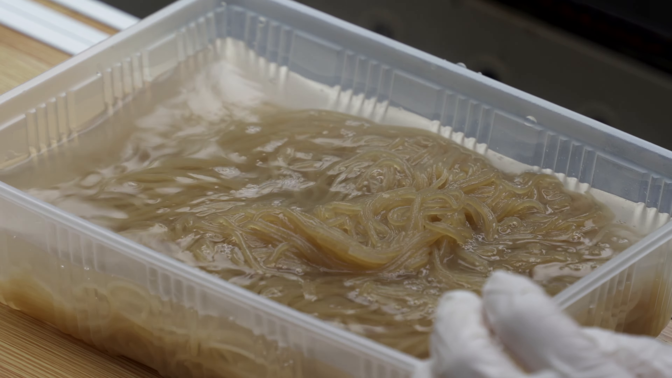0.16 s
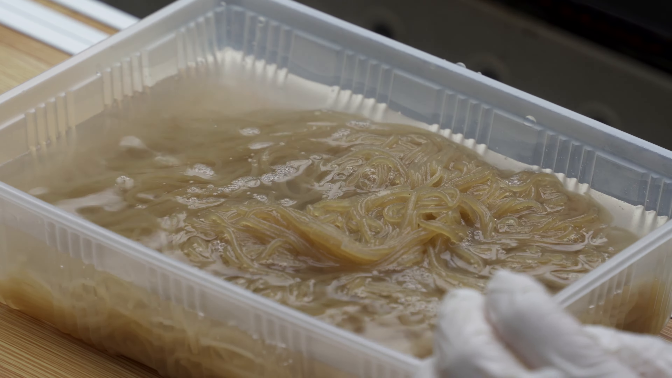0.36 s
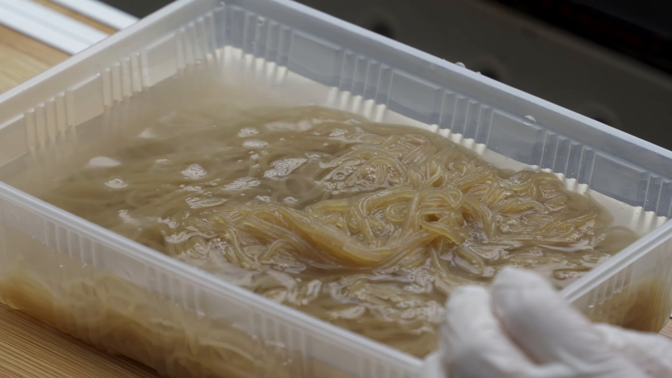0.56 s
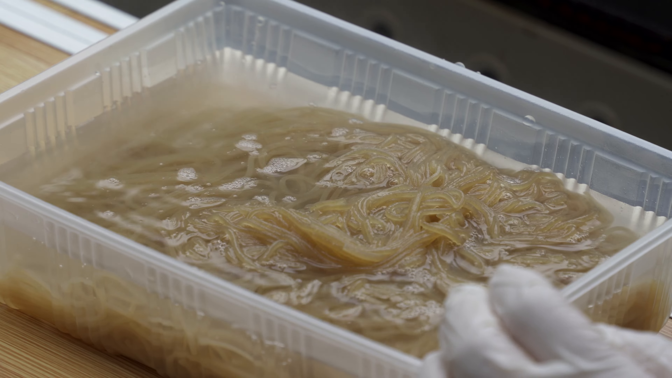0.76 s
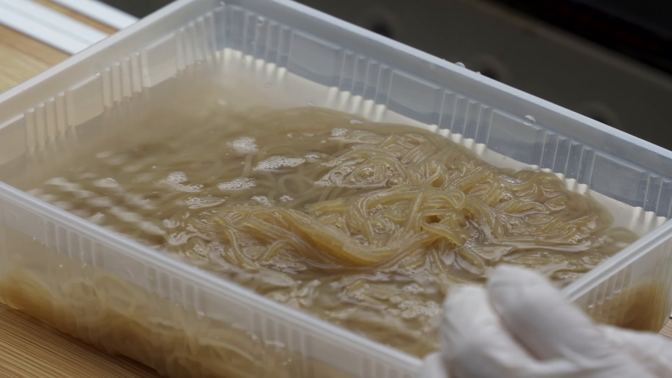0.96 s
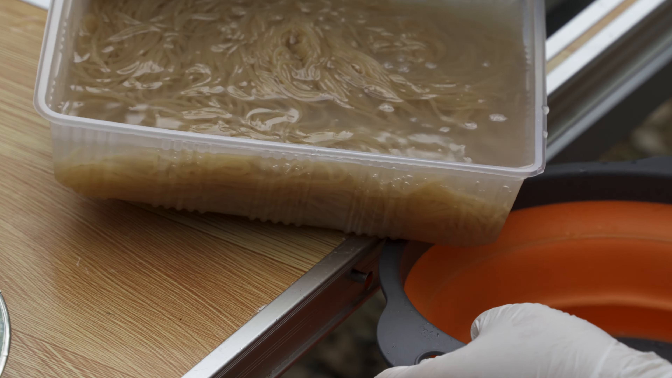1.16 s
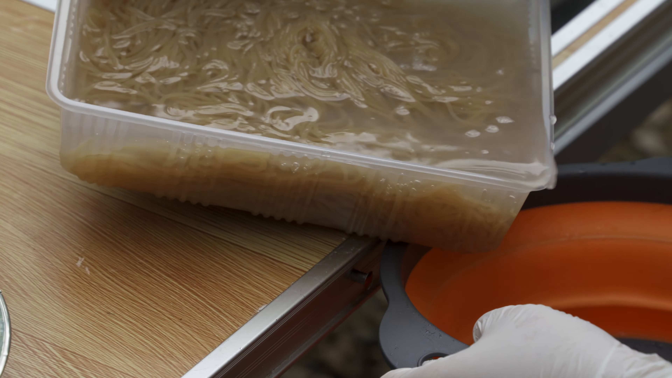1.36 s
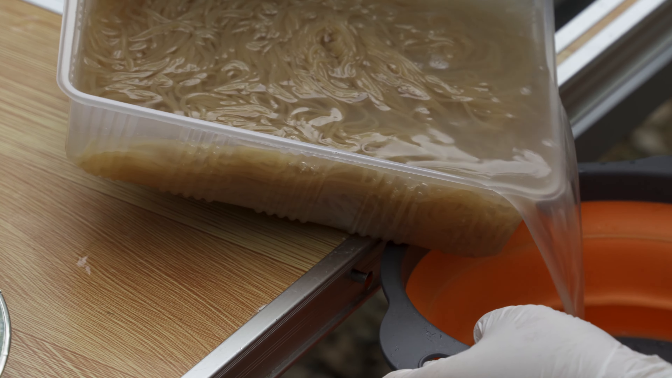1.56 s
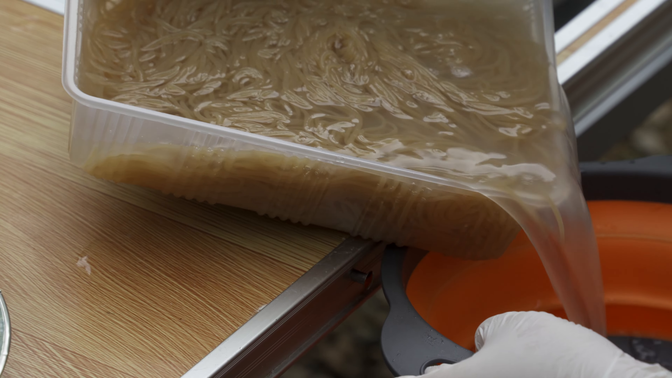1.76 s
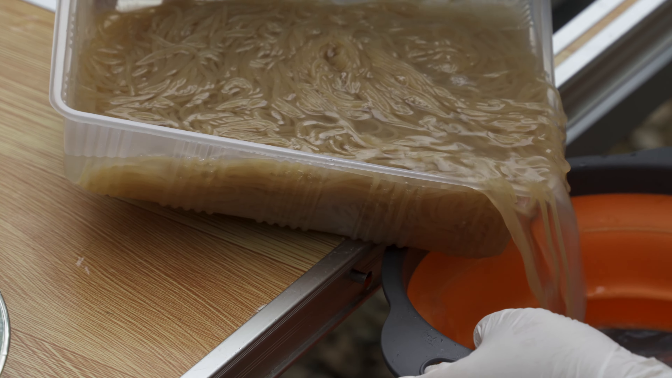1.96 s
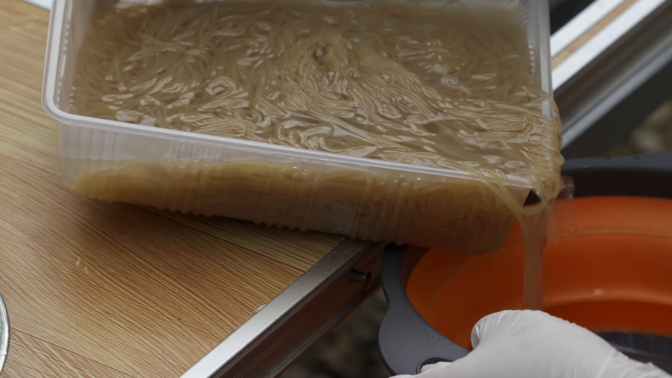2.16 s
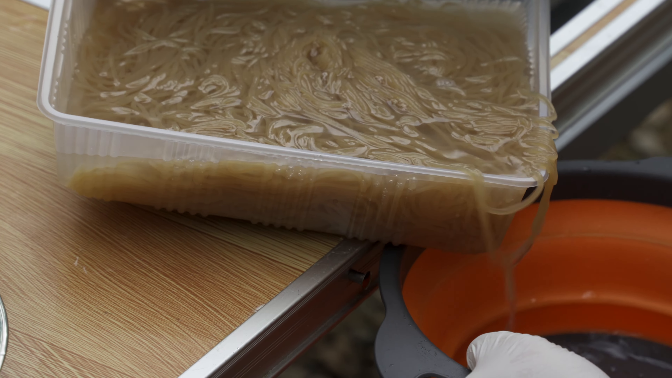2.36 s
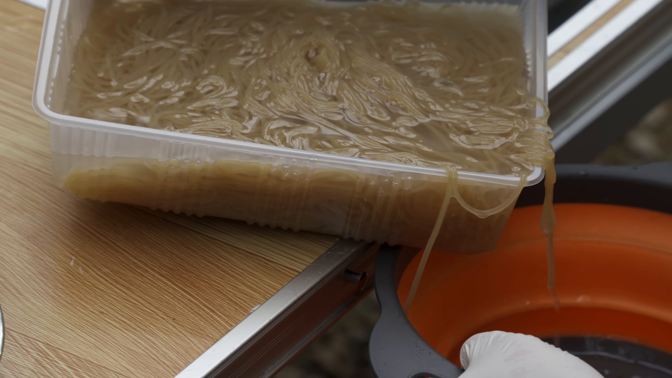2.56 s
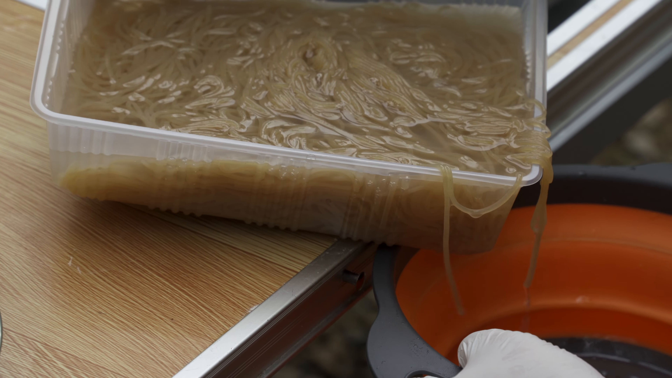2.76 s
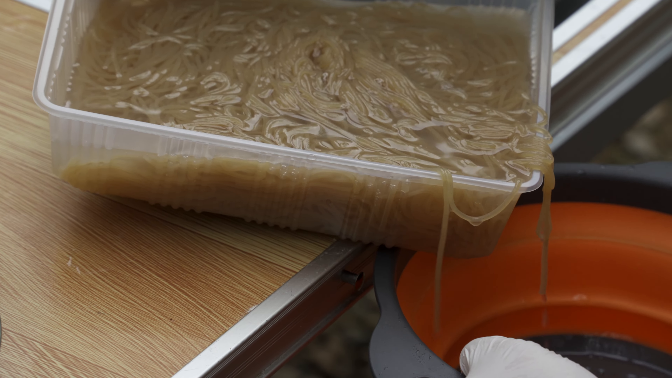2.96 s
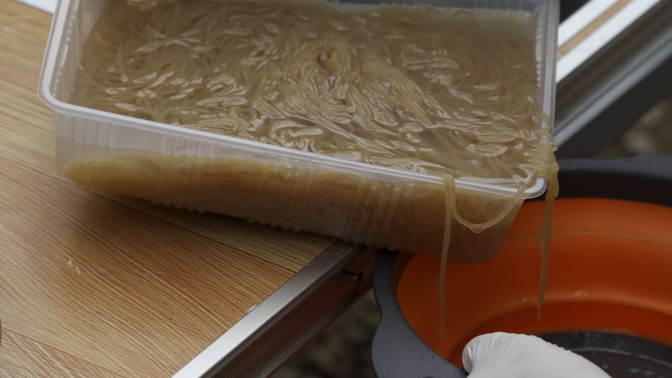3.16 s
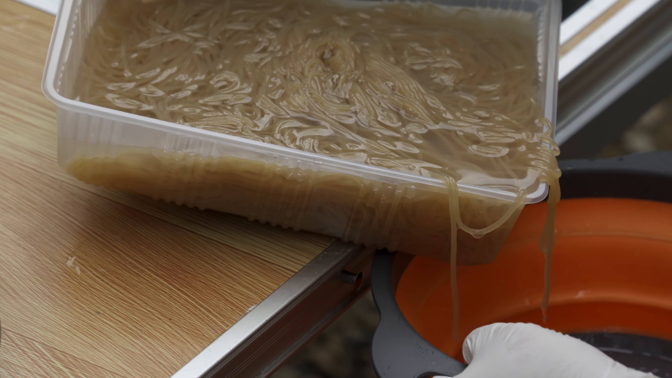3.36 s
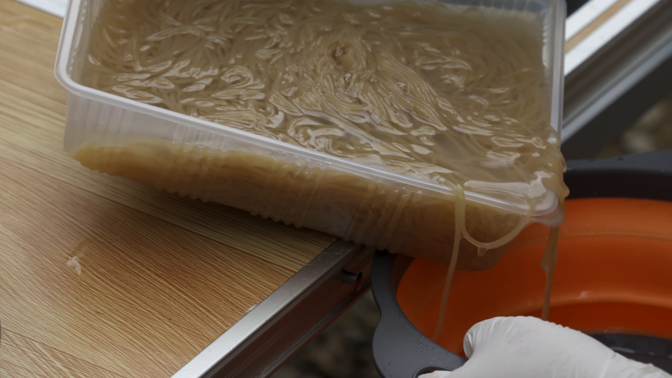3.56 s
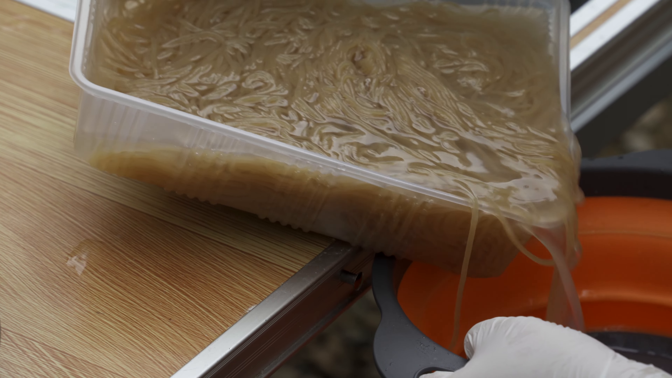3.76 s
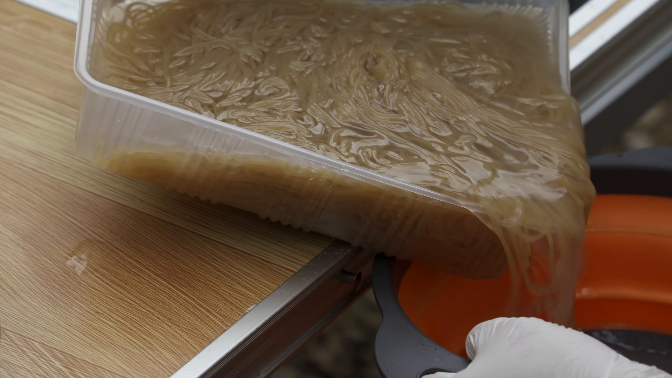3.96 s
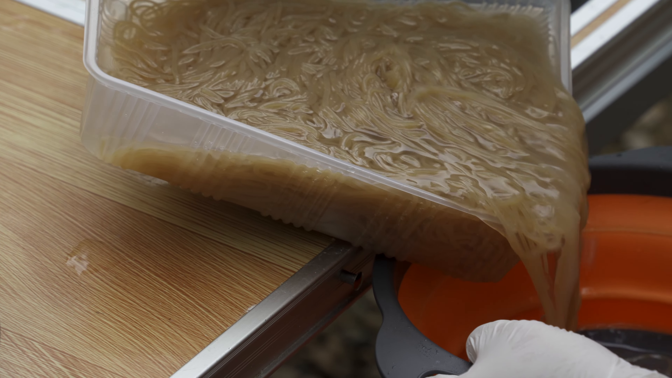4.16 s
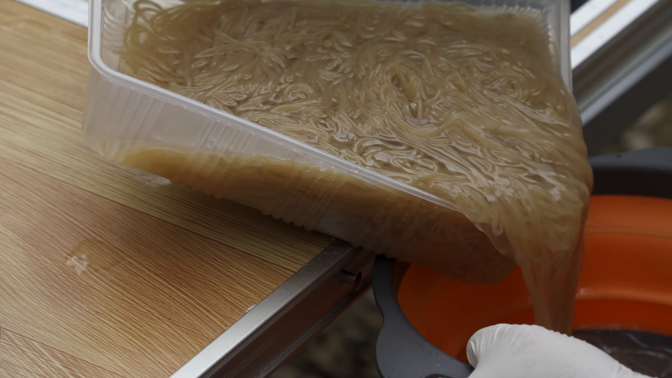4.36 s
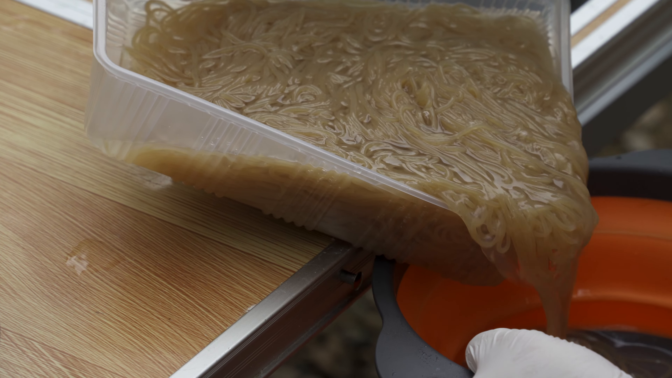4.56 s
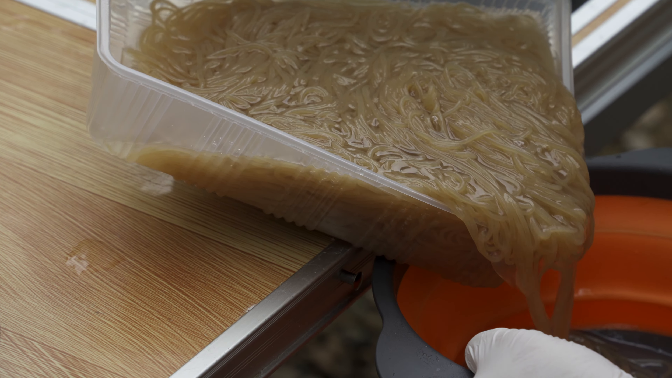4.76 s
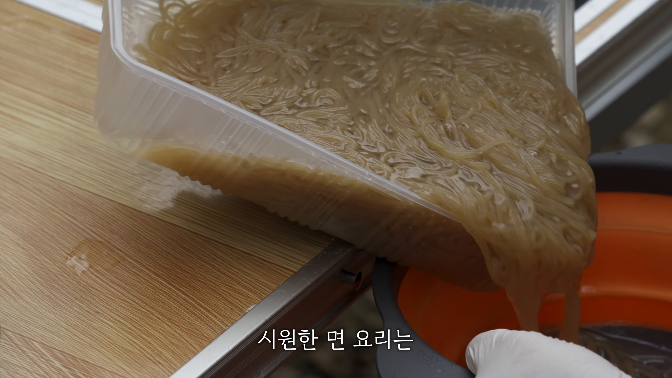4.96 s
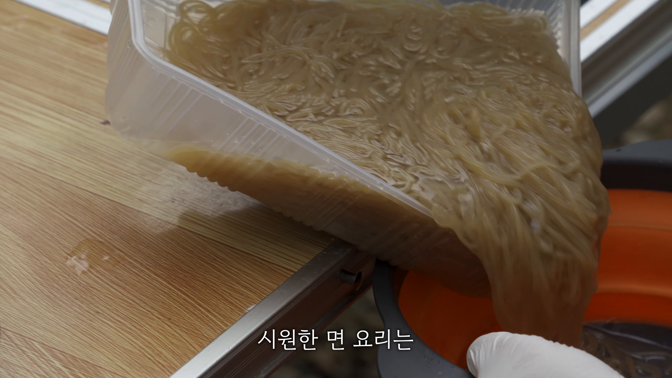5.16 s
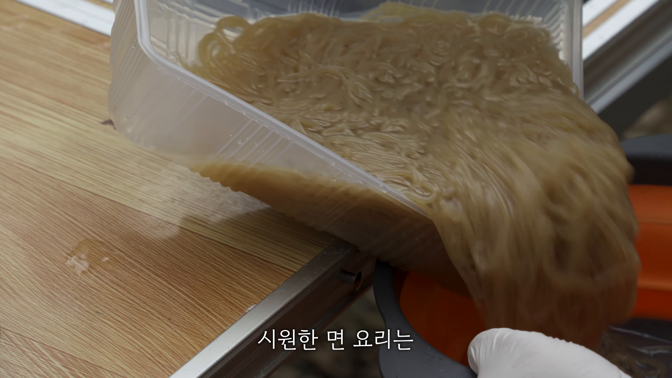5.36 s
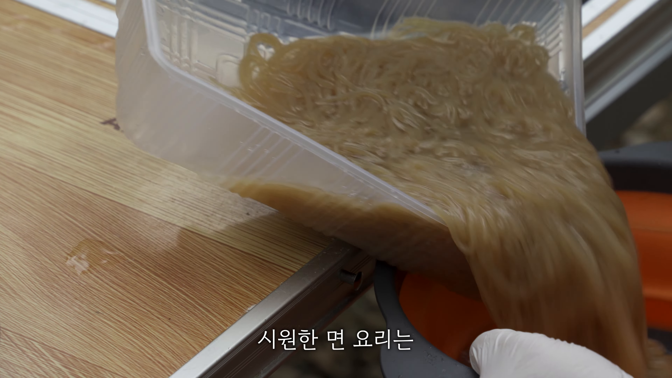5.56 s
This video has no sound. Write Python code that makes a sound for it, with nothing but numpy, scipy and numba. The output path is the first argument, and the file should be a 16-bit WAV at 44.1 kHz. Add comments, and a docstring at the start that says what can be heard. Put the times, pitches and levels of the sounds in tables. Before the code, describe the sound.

Two sharp knocks on a plastic tray outdoors, then a cut to starchy water and noodles pouring and splattering into a basin in two surges.

```python
"""Knocks on a plastic tray of noodles outdoors; the sound breaks off and fades in again at a basin.
Starchy water and noodles pour over the tray's lip: filtered-noise smacks, spray and hiss, bubble-grain gurgle,
toned plops. The tray rings in damped modes and scrapes as resonant noise.
Small birds are gliding sines; the dull open-air rumble is shaped noise. Both channels are equal."""
import sys
import numpy as np
from scipy import signal
from scipy.fft import rfft, irfft
from scipy.io import wavfile
from scipy.ndimage import uniform_filter1d
from numba import njit

SR = 44100
rng = np.random.default_rng(int(sys.argv[2]) if len(sys.argv) > 2 else 0)


def transcribe(signal):
    """Save signal, clipped to [-1, 1], as a 16-bit WAV file at the path in sys.argv[1]."""
    frames = np.atleast_2d(signal).T
    limited = np.clip(frames, -1, 1)
    pcm = np.round(limited * 32767).astype(np.int16)
    wavfile.write(sys.argv[1], SR, pcm)


N = 247401
BREAK_S, FADE_OUT_S, FADE_IN_S = 1.1305, .0037, .05
FULL_FLOW_DB = -50.5  # POUR_FLOW level of a full stream


def undb(db):
    """Decibels to gain."""
    return 10 ** (np.asarray(db) / 20)


def level(x, rms_db):
    """Scale to an rms level."""
    return x * undb(rms_db) / np.sqrt(np.mean(x ** 2))


def noise(n=N):
    """White noise, rms near 1."""
    return rng.standard_normal(n)


def curve(rows, outside=None):
    """Columns of a time table at every sample."""
    t_s, *columns = np.transpose(rows)
    return [np.interp(np.arange(N) / SR, t_s, c, outside, outside) for c in columns]


@njit
def svf(x, hz, width):
    """State-variable band-pass with a moving centre; width as a share of the centre."""
    y, b, l = np.empty(len(x)), 0., 0.
    for i in range(len(x)):
        g = np.tan(np.pi * hz[i] / SR)
        v = (b + g * (x[i] - l)) / (1 + g * (g + width))
        b, l, y[i] = 2 * v - b, l + 2 * g * v, width * v
    return y


def band(x, hz, width):
    """Band-pass applied twice for steep skirts."""
    hz = np.clip(hz + np.zeros(len(x)), 30, 18000)
    width = float(max(width, .005))
    return svf(svf(x, hz, width), hz, width)


@njit
def grains(start, hz, cycles, size, glide, n):
    """Tiny bubbles: each a sine that dies within some cycles while its pitch rises."""
    y = np.zeros(n)
    for k in range(len(start)):
        z, w, i = size[k] + 0j, 2 * np.pi * hz[k] / SR, start[k]
        fall = np.exp(-hz[k] / SR / cycles[k])
        for j in range(min(int(6 * cycles[k] * SR / hz[k]), n - i)):
            z *= fall * np.exp(1j * w * (1 + glide * j * hz[k] / SR / cycles[k]))
            y[i + j] += z.imag
    return y


def scatter(hz, octaves, cycles, spread_db, count):
    """Random rain of bubbles around a pitch track, a few far louder than the rest; rms 1."""
    at, chance = rng.integers(0, N, count), rng.standard_normal(count)
    pitch_hz = np.clip(hz[at] * 2 ** (octaves * chance), 200, 15500)
    size = undb(spread_db * rng.exponential(size=count))
    return level(grains(at, pitch_hz, np.full(count, cycles), size, 0.039, N), 0)


def walk(rate_hz):
    """Random levels held 1 / rate_hz and slewed twice; spread near 1."""
    k = int(SR / rate_hz)
    steps = np.repeat(rng.standard_normal(N // k + 1), k)
    return 1.53 * uniform_filter1d(uniform_filter1d(steps, k), k)[:N]


def add(out, t_s, sound, peak_db):
    """Place a short sound at its time with its peak level."""
    i = int(t_s * SR)
    out[i:i + len(sound)] += (sound * undb(peak_db) / np.abs(sound).max())[:N - i]


def coloured(spectrum):
    """Noise with a given spectrum, scaled to rms 1 between 150 and 450 Hz."""
    hz = np.fft.rfftfreq(N, 1 / SR)[1:]
    point_hz, point_db = np.transpose(spectrum)
    gain = undb(np.interp(np.log(hz), np.log(point_hz), point_db))
    gain /= np.sqrt(np.sum(gain[(hz > 150) & (hz < 450)] ** 2) / len(hz))
    return irfft(rfft(noise()) * np.append(0, gain), N)


# open-air level by the tray, 150-450 Hz: t/s, level/dB
TRAY_AIR_LEVEL = [(0, -64), (.47, -64), (.93, -61.5), (1.12, -59)]
# open-air spectrum by the tray: f/Hz, relative density/dB
TRAY_AIR_SPECTRUM = [(24, -80), (40, -52), (159, -9), (345, -1), (852, -8.5), (2210, -15), (4340, -16),
                     (6490, -22.5), (8340, -24), (16000, -40.5)]
# narrow high noise bands by the tray: f/Hz, width/Hz, rms level before waver/dB
WHINES = [(8350, 140, -78), (6850, 160, -86), (4400, 260, -78)]


def tray_air():
    """Wavering open-air rumble as shaped noise, plus faint whines as narrow noise bands."""
    out = coloured(TRAY_AIR_SPECTRUM) * undb(curve(TRAY_AIR_LEVEL)[0] + .8 * walk(6))
    for hz, width_hz, rms_db in WHINES:
        out += level(band(noise(), hz, width_hz / hz), rms_db) * undb(2 * walk(12))
    return out


# open-air spectrum by the basin: f/Hz, relative density/dB
BASIN_AIR_SPECTRUM = [(24, -52), (60, -72), (130, -16), (231, -5.5), (491, -4), (790, -9.5), (1270, -9.5),
                      (2700, -14), (6000, -22), (16000, -50)]


def basin_air(full_db=-62, per_flow_db=.55, hum_hz=208, hum_width_hz=13.6, hum_rms_db=-77):
    """Shaped-noise rumble that grows with the flow, and a wavering hum from a narrow noise band."""
    flow_db = curve(POUR_FLOW)[0] - FULL_FLOW_DB
    rumble = coloured(BASIN_AIR_SPECTRUM) * undb(full_db + per_flow_db * flow_db + walk(6.23))
    return rumble + level(band(noise(), hum_hz, hum_width_hz / hum_hz), hum_rms_db)


# bird notes: t/s, length/s, first f/Hz, last f/Hz, peak level before echoes/dB
BIRD_NOTES = [(1.57, 0.056, 6900, 5950, -57.5), (1.69, 0.046, 7400, 6960, -66),
              (1.731, 0.032, 6700, 5800, -53.5), (1.861, 0.029, 4300, 3530, -51.5),
              (1.861, 0.023, 5700, 4770, -51), (1.902, 0.039, 3600, 3300, -63),
              (1.953, 0.023, 3100, 2570, -60), (3.831, 0.092, 6850, 6320, -54.5),
              (3.848, 0.038, 4200, 3930, -56), (3.853, 0.033, 7100, 7100, -59),
              (3.968, .045, 4100, 3900, -60), (4, 0.063, 6250, 6050, -49), (4.028, 0.034, 7300, 7300, -50),
              (4.125, 0.079, 6150, 5980, -54), (4.288, 0.05, 6150, 6070, -48)]


def birds(echo_db=-11, echo_t60_s=0.26):
    """Whistles that fall and level out or hold, swell and waver, with a faint smear of echoes."""
    out = np.zeros(N)
    for t_s, length_s, first_hz, last_hz, peak_db in BIRD_NOTES:
        n = int(length_s * SR)
        u = np.arange(n) / n
        waver = undb(3 * uniform_filter1d(noise(n), 200) * np.sqrt(200))
        hz = last_hz + (first_hz - last_hz) * (1 - u) ** 1.7
        whistle = np.sin(2 * np.pi * np.cumsum(hz) / SR)
        add(out, t_s, whistle * np.sin(np.pi * u ** 1.5) * waver, peak_db)
    t = np.arange(SR // 8) / SR
    echoes = noise(len(t)) * 1000. ** (-t / echo_t60_s)
    return out + undb(echo_db) * signal.fftconvolve(out, echoes / np.linalg.norm(echoes))[:N]


# blows on the tray: t/s, peak level/dB, best-rung f/Hz, reach/octaves, t60 scale
KNOCKS = [(.598, -37.5, 1220, 2.6, 0.51), (0.7012, -15, 1110, 1.18, 0.7), (0.709, -35, 900, 2.1, 0.19),
          (.722, -29, 754, 0.92, 0.36), (0.74, -41, 736, 1.2, 1.3), (.763, -39, 1060, 0.71, 0.98),
          (1.073, -34, 805, 1.1, 1.5), (1.089, -12, 602, 0.17, 0.45), (1.0995, -37, 625, 0.22, 0.4),
          (1.120, -30, 630, 0.15, 0.51), (1.357, -48, 2520, 4, 1.7), (1.418, -42.5, 870, 0.92, 0.23)]
# tray modes: f/Hz, relative level/dB, t60 before scale/s
TRAY_MODES = [(298, 8.5, 0.052), (364.6, 3.5, 0.19), (470, 8.5, 0.039), (558, 0.5, 0.07), (630, 8.5, 0.042),
              (734, -3, 0.19), (847, 4, 0.059), (1065, 2, 0.066), (1178, -3.5, 0.11), (1328, -1, 0.08),
              (1582, -21, 0.098), (1890, 1, 0.07), (2058, -11.5, 0.22), (2306, -0.5, 0.06),
              (2597, 5, 0.041), (3620, 6.5, 0.024), (4160, -6, 0.085), (4580, 8, 0.018), (5440, -22, .05)]


def knocks(rattle_db=-18, crack_db=-24, rattle_t60_s=0.089, rise_s=0.0012):
    """Each blow lands elsewhere and rings its own share of the tray's modes, with a loose rattle."""
    out, t = np.zeros(N), np.arange(SR // 4) / SR
    hz, mode_db, t60_s = np.transpose(TRAY_MODES)[:, :, None]
    for t_s, peak_db, best_hz, reach, scale in KNOCKS:
        near_best = 1 / (1 + (np.log2(hz / best_hz) / reach) ** 4)
        share = undb(mode_db) * (near_best + undb(crack_db) * (hz > best_hz))
        ring = np.sum(share * np.sin(2 * np.pi * hz * t) * 1000. ** (-t / t60_s / scale), axis=0)
        rattle = band(noise(len(t)) * 1000. ** (-t / rattle_t60_s), best_hz, 1.14 * reach)
        blow = ring / np.abs(ring).max() + undb(rattle_db) * rattle / np.abs(rattle).max()
        add(out, t_s, blow * (1 - np.exp(-(t / rise_s) ** 2)), peak_db)
    return signal.sosfilt(signal.butter(2, 200, "highpass", fs=SR, output="sos"), out)


# tray scrapes: t/s, length/s, level at the top of the swell/dB, f/Hz, width as a share of f
SCRAPES = [(2.793, 0.17, -45, 2520, .65), (3.054, 0.13, -38, 2710, 0.23)]


def scrapes(swell_share=.55, edge_drop_db=15.5):
    """Stick-slip of wet plastic on wood: uneven noise in a resonance and weak overtone, swelling and dying."""
    out = np.zeros(N)
    for t_s, length_s, top_db, hz, width in SCRAPES:
        edge_db = top_db - edge_drop_db
        swell = [(t_s, edge_db), (t_s + swell_share * length_s, top_db), (t_s + length_s, edge_db)]
        swell_db = curve(swell, -120)[0]
        rub = noise() * undb(2.5 * walk(120))
        resonance = level(band(rub, hz, width), 0)
        overtone = level(band(rub, 1.5 * hz, 0.42), -10)
        out += undb(swell_db) * (resonance + overtone)
    return out


# lumps of noodles and water into the basin: t/s, peak level/dB, f/Hz
PLOPS = [(2.149, -40.5, 870), (2.188, -41, 633), (2.214, -34, 1103), (2.226, -30, 1160),
         (2.235, -29.5, 1140), (2.247, -25.5, 1730), (2.652, -35.5, 1310), (3.475, -37.5, 1390),
         (3.536, -45, 1150), (3.761, -45.5, 750), (3.862, -50, 720), (3.89, -52, 755), (3.925, -53, 740),
         (4.043, -49, 726), (4.118, -42, 694), (4.174, -38, 703), (4.201, -43.5, 680), (4.843, -42.5, 504),
         (5.082, -38, 2060), (5.15, -34.5, 1470), (5.423, -40, 1470), (5.554, -25, 898), (5.565, -27, 824),
         (5.58, -22.5, 875)]


def plops(t60_cycles=45, tone_db=-3.5):
    """Heavy lumps ring the air in the basin: a weak tone inside a rough wet slap."""
    out, t = np.zeros(N), np.arange(SR // 8) / SR
    for t_s, peak_db, hz in PLOPS:
        shape = 1000. ** (-t * hz / t60_cycles) * (1 - np.exp(-t * hz / 0.27))
        slap = band(noise(len(t)) * shape, hz, 1.0)
        tone = np.sin(2 * np.pi * hz * t) * shape
        add(out, t_s, undb(tone_db) * tone + slap / np.abs(slap).max(), peak_db)
    return out


# drops that smack the pool: t/s, smack peak level/dB, f/Hz, treble re smack/dB, spray re smack/dB
DROPS = [(1.6793, -54, 9800, -18, -18), (1.799, -53, 10500, -15, -18), (1.8132, -49.5, 3880, -21, -24),
         (1.8623, -45, 8000, -17, -12), (1.8929, -40, 3930, -25, -12), (1.929, -50, 7400, -18, -20),
         (1.9472, -49.5, 4680, -18, -5), (2.0027, -37, 4100, -14, -33), (2.029, -37, 8200, -21, -19),
         (2.044, -35, 4100, -30, -6), (2.077, -39, 4250, -30, -4), (2.0855, -37.5, 4400, -22, -2),
         (2.1371, -42, 3600, 1, -20), (2.1569, -34, 3030, -1, -35), (2.189, -31.5, 6700, -27, -33),
         (2.2059, -34.5, 2900, -25, -19), (2.217, -41, 4540, -21, 2), (2.228, -34.5, 4330, -27, 1),
         (2.3304, -31, 5550, -8, -3.5), (2.3676, -28.5, 4130, -9, -7), (2.4362, -37.5, 3700, -30, -4),
         (2.4921, -37.5, 4500, -3.5, -2), (2.5449, -36, 4900, -8, 2.5), (2.5672, -34.5, 7640, -15, -28),
         (2.619, -33, 4800, -2.5, 3), (2.648, -36, 5400, -6, -6), (2.6682, -33.5, 7340, -7, 1),
         (2.7204, -40, 7600, -21, -23), (2.7685, -30.5, 4030, -33, -10), (2.7957, -43.5, 6660, 1, -3),
         (2.8336, -28.5, 4700, -10, -10), (2.8922, -32, 3870, -13, -14), (2.9307, -25.5, 6400, -8.5, -16),
         (3.021, -48, 8460, -18, 6), (3.1589, -32.5, 2740, -22, -6.5), (3.2595, -44, 5200, -21, -14),
         (3.7291, -50, 2230, -26, -22), (3.8212, -55.5, 2670, -29, 2), (3.985, -53.5, 4500, -15, -6),
         (4.02, -38.5, 4900, -35, -15), (4.0436, -37, 4200, -19, -15), (4.1174, -39.5, 4640, -35, -10),
         (4.1744, -38.5, 3080, -5, -9), (4.2827, -37.5, 4500, -1, -9), (4.3349, -26.5, 4020, -21, -7),
         (4.3763, -24, 3960, -12, -16), (4.3969, -33, 4400, -20, -8), (4.4068, -33.5, 5500, -22, -2),
         (4.4965, -45, 4870, -14, -5), (4.5454, -27.5, 3640, -15, -2), (4.558, -31, 6050, -25, -8),
         (4.5972, -19, 3660, -13.5, -19), (4.6176, -29, 4970, -15, -17.5), (4.6502, -24, 7900, -15, -8),
         (4.6616, -36.5, 2970, -16, -21), (4.763, -35.5, 4230, -30, -8), (4.7969, -37, 6340, -16, 2),
         (4.8167, -18.5, 3000, -24, -12), (4.8516, -24.5, 4720, -7.5, -12), (4.8777, -22.5, 4740, -17, -11),
         (4.9175, -24.5, 5040, -25, -8.5), (4.9307, -36.5, 6300, 6.5, -15), (4.9925, -36, 4000, -11, -3),
         (5.0058, -29, 5500, -20, -18), (5.0358, -30.5, 4230, -2, -9), (5.052, -39, 4500, 3, 1),
         (5.078, -39.5, 4970, 1, 1), (5.0955, -28.5, 3400, -9, -7.5), (5.1053, -25.5, 5000, -15, -6.5),
         (5.1487, -28, 4400, -11, -13), (5.1777, -34, 2420, -30, -3), (5.1897, -21, 4440, -17, -8),
         (5.2074, -30, 3700, -25, -3), (5.2896, -30.5, 3650, -6, -10), (5.3499, -17, 3430, -21, -10.5),
         (5.3711, -28, 3980, -8.5, -14), (5.4351, -25.5, 4700, -16, -19), (5.4484, -31.5, 4520, -18, -17),
         (5.4871, -34, 4720, -7, -3), (5.5121, -27.5, 7350, -22, -5), (5.548, -26.5, 4550, -28, -1.5),
         (5.562, -27, 2710, -9, 0.5), (5.5768, -18, 5960, -24, -19)]


def drops(rows, count=7, smack_t60_s=0.016, spray_s=0.015, fallback_db=-3, bright_spray_db=4.5):
    """A short smack, then a lumpy puff of spray with droplets falling back around it."""
    out, n = np.zeros(N), SR // 25
    t = np.arange(n) / SR
    for t_s, peak_db, hz, treble_db, spray_db in rows:
        smack = 1000. ** (-t / smack_t60_s) * (1 - np.exp(-t / 0.00036))
        lumps = undb(1.64 * np.repeat(noise(n // 64 + 1), 64)[:n])
        puff = np.exp(-(t / spray_s) ** 4.5) * lumps
        bright = smack + undb(bright_spray_db + spray_db) * puff
        add(out, t_s, band(noise(n) * smack, hz, 0.39), peak_db)
        add(out, t_s, band(noise(n) * puff, hz, 0.74), peak_db + spray_db)
        add(out, t_s, band(noise(n) * bright, 8500, 0.66), peak_db + treble_db)
        late_s = rng.random(count) * spray_s * 2.1
        size_chance, pitch_chance = rng.standard_normal((2, count))
        pitch_hz = np.clip(hz * 2 ** (0.543 * pitch_chance), 500, 15000)
        start = (late_s * SR).astype(np.int64)
        droplets = grains(start, pitch_hz, np.full(count, 3.5), undb(3.9 * size_chance), 0.22, n)
        add(out, t_s, droplets, peak_db + fallback_db + spray_db)
    return out


# flow of the stream: t/s, spray reference level/dB
POUR_FLOW = [(1.17, -74.5), (1.4, -64.5), (1.53, -63), (1.86, -66.5), (2.23, -51), (2.41, -49.5),
             (2.7, -51), (3.04, -52), (3.18, -56.5), (3.38, -59), (3.61, -66.5), (3.89, -69), (4.5, -50.5),
             (4.85, -51), (4.99, -49.5), (5.14, -53.5), (5.35, -52.5), (5.61, -47)]


def pour(count=420, gurgle_full_db=-59, gurgle_per_flow_db=0.38):
    """The stream breaks into small drops over fizz, thin hiss and fine mist; the basin gurgles under it."""
    spray_db = curve(POUR_FLOW)[0]
    flow_db = spray_db - FULL_FLOW_DB
    at_s = rng.uniform(POUR_FLOW[0][0], N / SR, count)
    chance = rng.standard_normal((4, count))
    pitch_hz = np.clip(5200 * 2 ** (0.58 * chance[1]), 2200, 13000)
    small = np.transpose([at_s, 4.2 * chance[0], pitch_hz, -22 + 5 * chance[2], -11 + 2.7 * chance[3]])
    # a thin stream runs smoothly, a full one spatters
    spatter = level(drops(small, count=4), -3.5) * undb(1.3 * flow_db)
    fizz = scatter(np.full(N, 5200.), .55, 5, 3.0, count=9000) * undb(-6 + 1.5 * walk(40))
    mist = level(band(noise(), 10800, 0.59), -19) * undb(3.9 * walk(45))
    hiss = level(band(noise(), 5900, 1.15), -9.0) * undb(3.1 * walk(29.6))
    gurgle = scatter(np.full(N, 740.), .28, 6, 1.5, count=4000)
    gurgle *= undb(gurgle_full_db + gurgle_per_flow_db * flow_db)
    return undb(spray_db) * (spatter + fizz + hiss + mist) + gurgle


def scene():
    """The tray until the break, then the basin fading in."""
    t = np.arange(N) / SR
    tray = knocks()
    fade_out = np.clip((BREAK_S - t) / FADE_OUT_S, 0, 1)
    fade_in = np.clip((t - BREAK_S) / FADE_IN_S, 0, 1)
    before = tray_air() + tray
    late_tray = tray * (t > BREAK_S + .1)  # without the ring of the early knocks at the break
    after = basin_air() + birds() + late_tray + scrapes() + plops() + drops(DROPS) + pour()
    return np.tile(fade_out * before + fade_in * after, (2, 1))


def record(dry, bass_cut_hz=90, top_hz=16100):
    """The microphone drops the deep bass; a steep low-pass cuts the top."""
    thin = signal.sosfilt(signal.butter(3, bass_cut_hz, "highpass", fs=SR, output="sos"), dry)
    return signal.sosfilt(signal.ellip(10, .2, 70, top_hz, fs=SR, output="sos"), thin)


dry = scene()
out = record(dry)
transcribe(out)
```